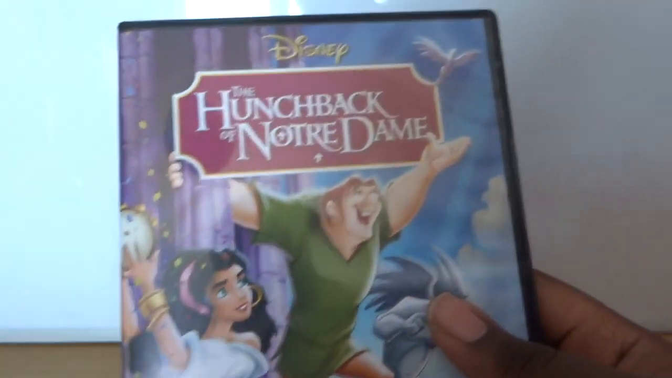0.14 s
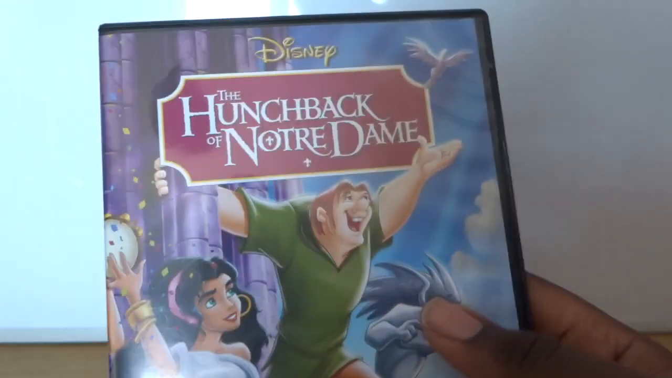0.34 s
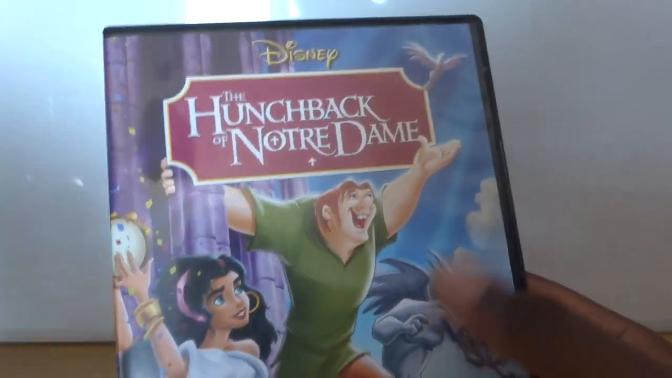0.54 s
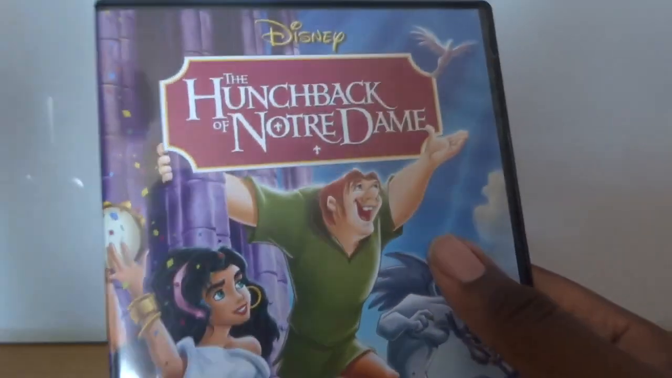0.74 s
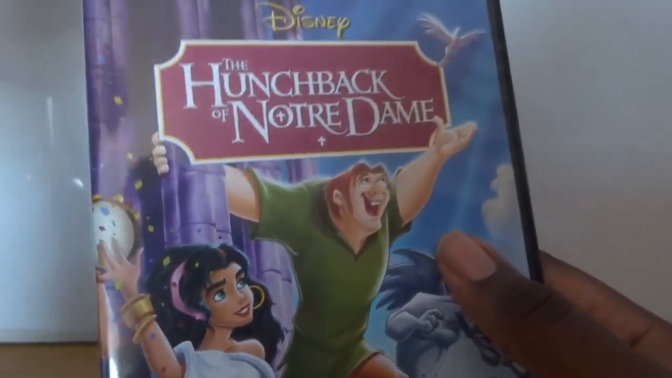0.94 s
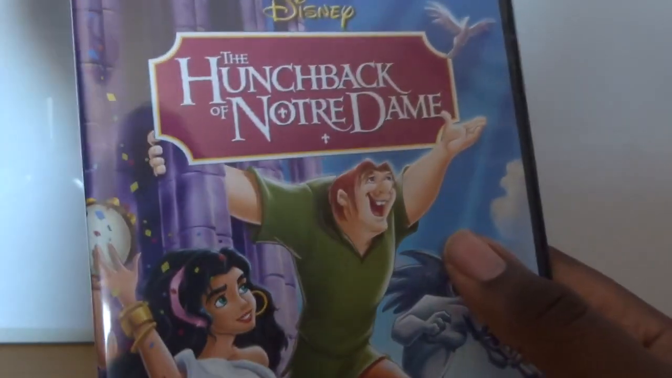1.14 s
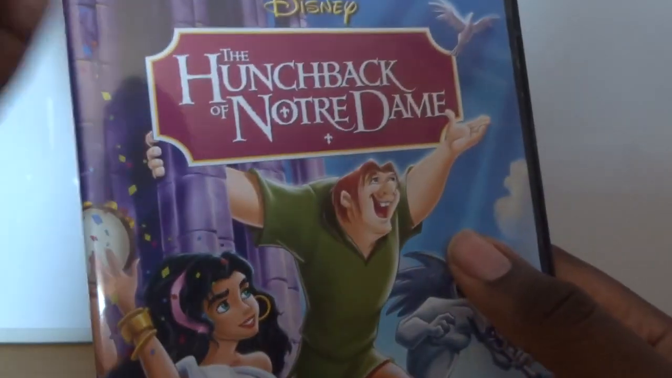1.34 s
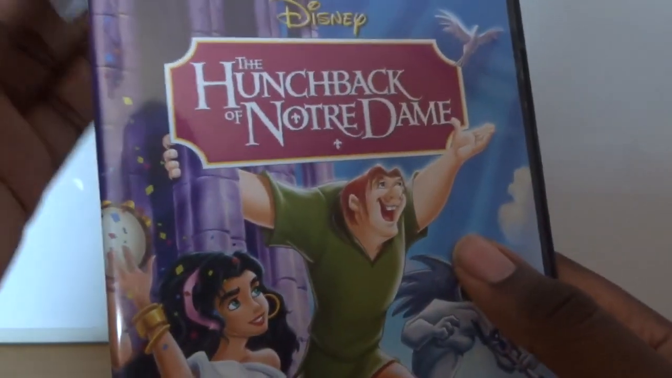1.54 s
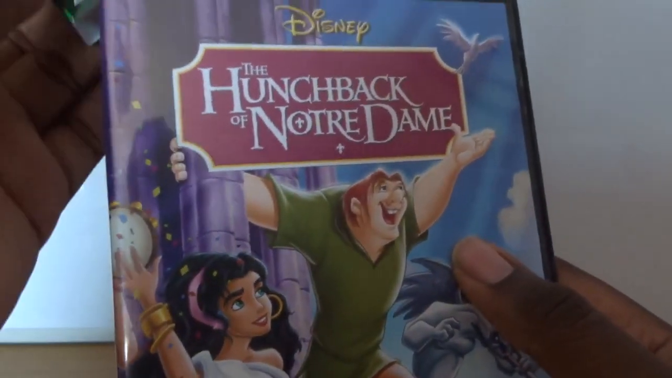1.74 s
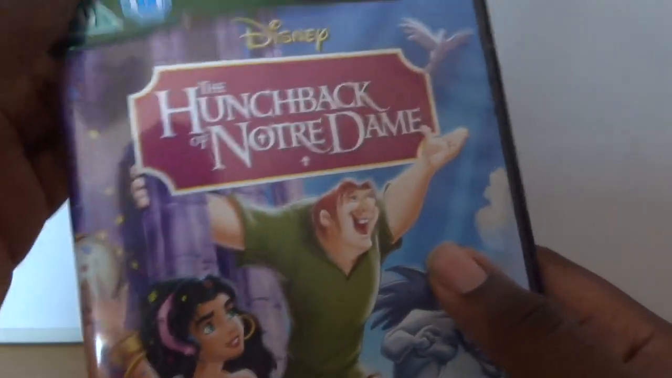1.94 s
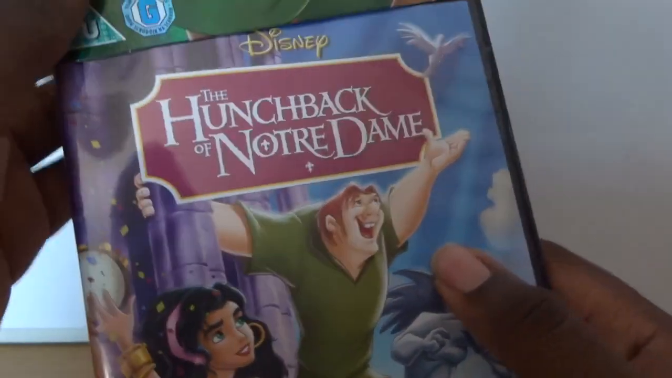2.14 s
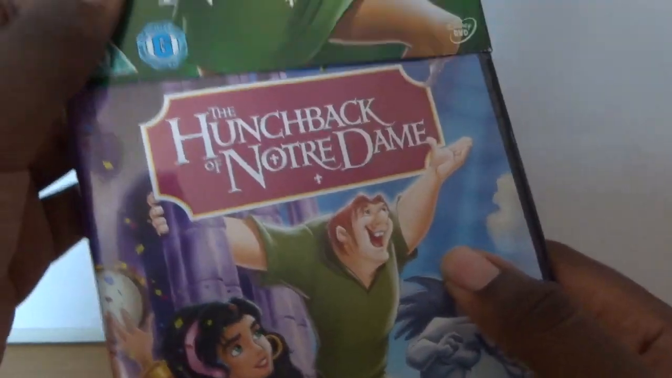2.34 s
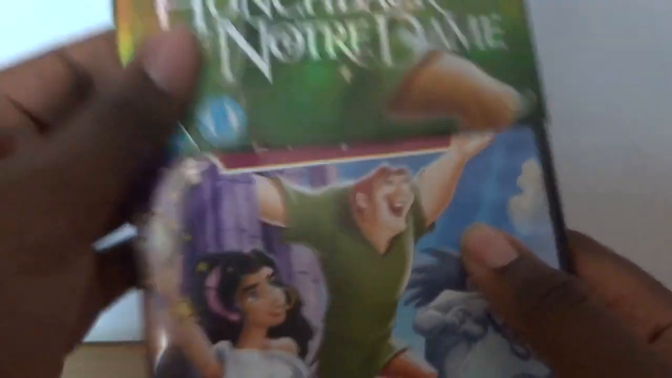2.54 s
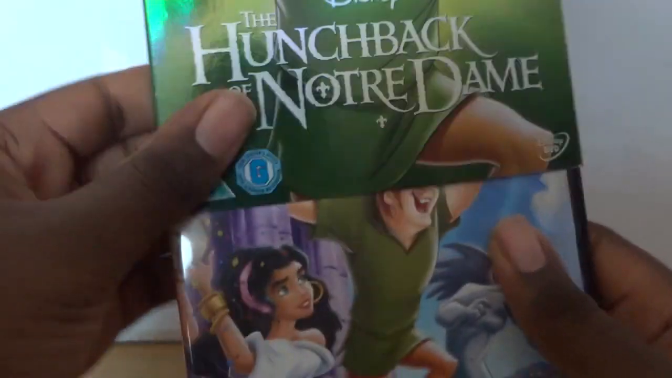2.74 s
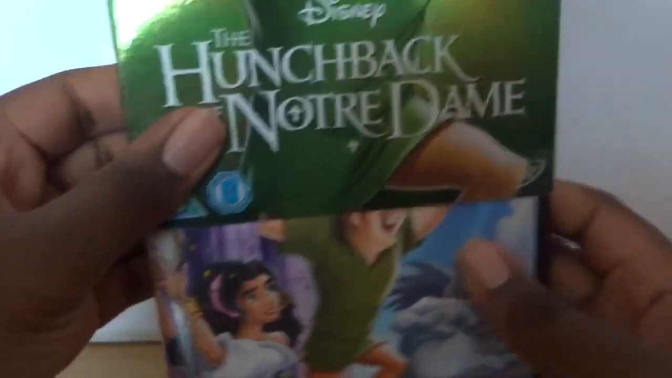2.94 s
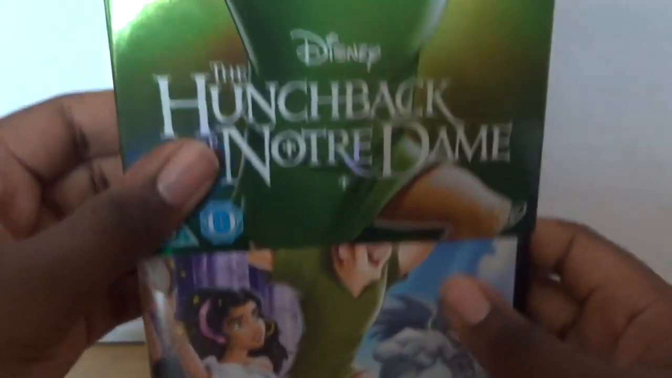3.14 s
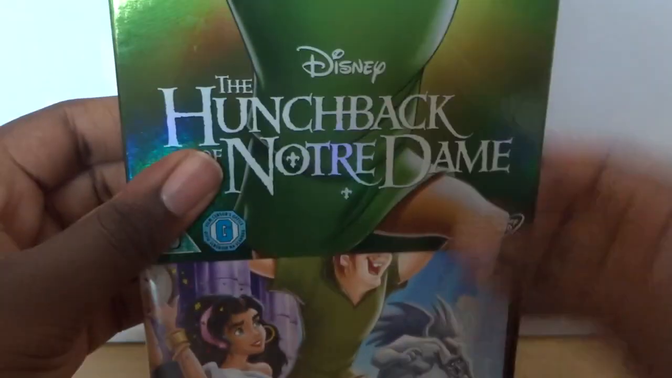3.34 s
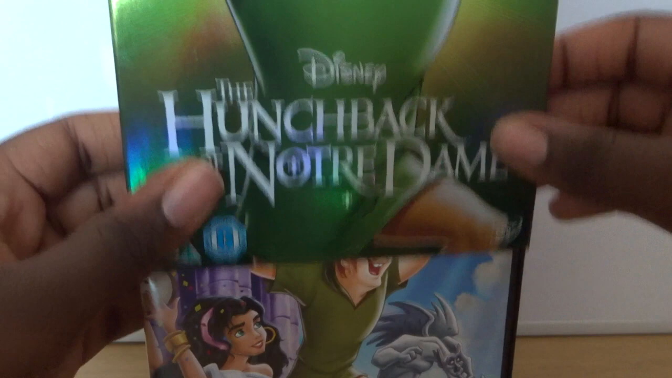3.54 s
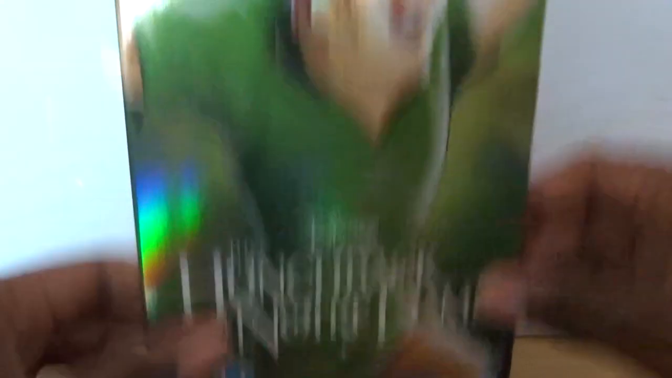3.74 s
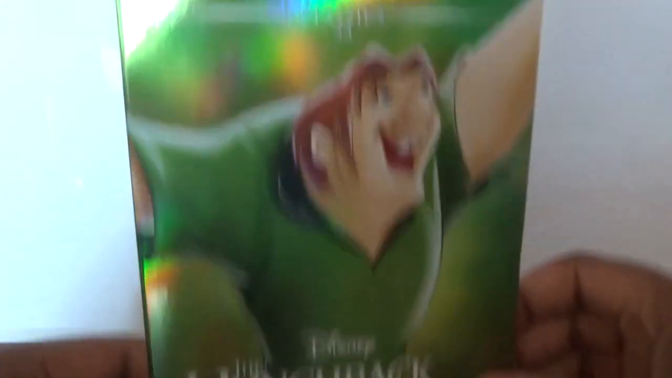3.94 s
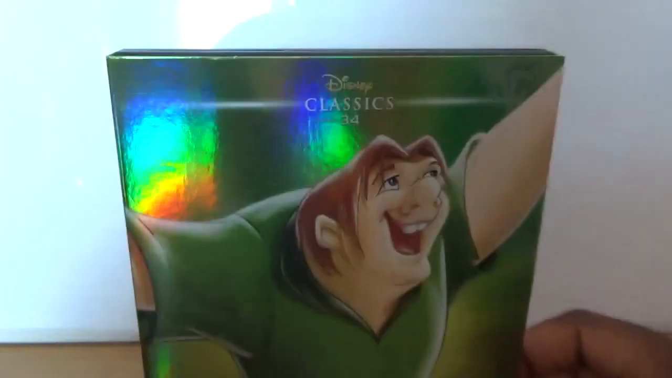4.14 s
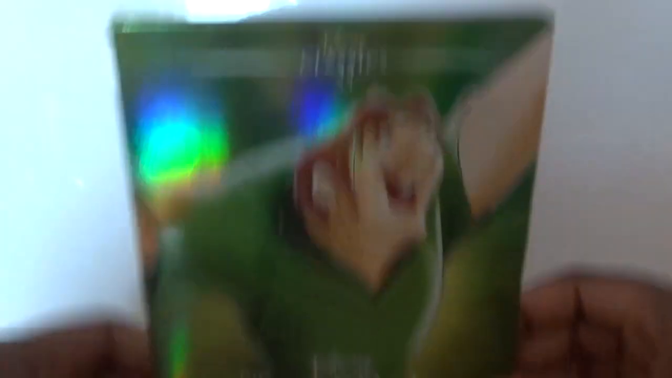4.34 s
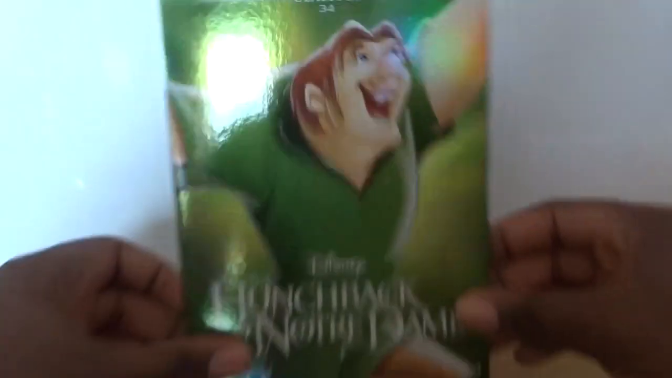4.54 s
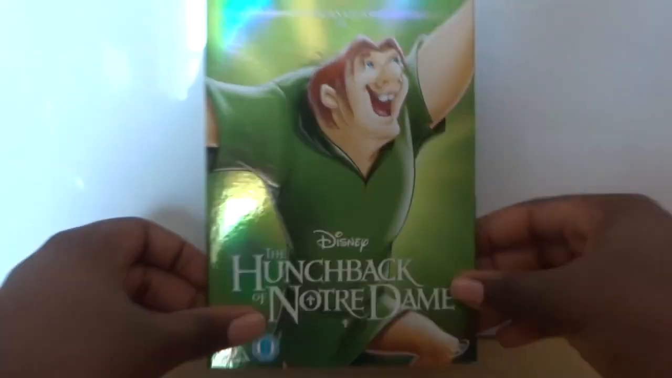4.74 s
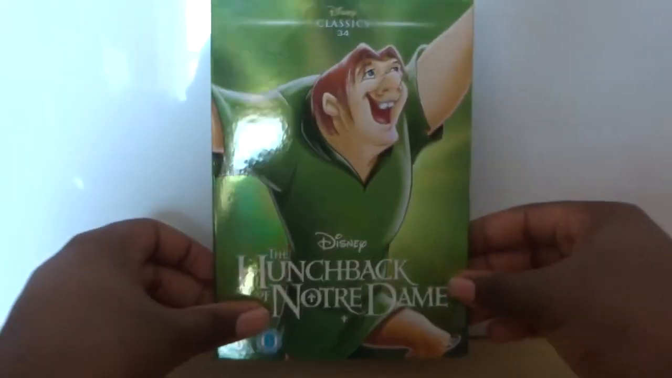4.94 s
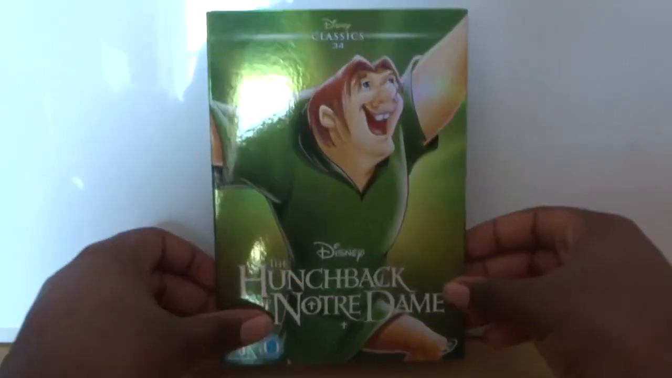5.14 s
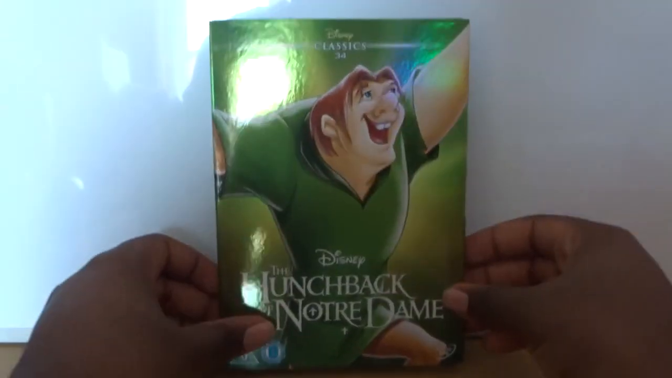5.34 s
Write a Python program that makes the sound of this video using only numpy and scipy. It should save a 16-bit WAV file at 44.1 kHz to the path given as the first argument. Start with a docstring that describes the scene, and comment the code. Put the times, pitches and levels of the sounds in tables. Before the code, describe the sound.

A close stereo scene in a small, slightly live room, with constant soft hum and a narrow fan whirr. For the first 1.5 seconds there are only very faint rubs, ticks and hand bumps on a hollow plastic case, slightly left. At about 1.65 a crisp click sounds, then scuffs and another sharp tick near 2.0. A bright click at 2.4 starts a quick wiggling rub of cardboard over plastic, catching lightly until 2.8, followed by dull taps around 2.95. At 3.27 the case knocks firmly onto a desk with small rebounds. From 3.6 to 4.15 the card sleeve scrapes down, strongest near 3.7 and 3.87, with a low wooden drone. It lands at 4.15 to 4.17 with a loud rattling knock and quickly dying buzz. Small ticks and scuffs follow, with a light tap and soft bump around 4.85, then faint finger ticks to about 5.3.

```python
"""Close stereo scene in a small room; hum and a narrow fan whirr run throughout as filtered noise.
Fingers tick and rub a hollow plastic case: impulses and friction slips drive its resonances.
A cardboard sleeve is wiggled over its top, catching lightly; the case is stood on a desk with a knock.
The sleeve scrapes down over it, droning in the desk, and lands with a rattling knock and a dying buzz.
Last come a few finger ticks, scuffs and soft bumps."""
import sys
import numpy as np
from scipy import signal
from scipy.fft import rfft, irfft, next_fast_len
from scipy.io import wavfile
from scipy.ndimage import uniform_filter1d

SR = 44100
rng = np.random.default_rng(int(sys.argv[2]) if len(sys.argv) > 2 else 0)


def transcribe(u):
    """Save the signal u as a 16-bit wav file named by the first command-line argument.

    u: samples, shape (n,) or (channels, n), limited to [-1, 1]; the rate is SR.
    q: integer samples, one column per channel.
    """
    v = np.clip(np.atleast_2d(u).T, -1, 1)
    q = np.round(v * 32767).astype(np.int16)
    wavfile.write(sys.argv[1], SR, q)


N = 242018
TOP_HZ = 11100
T = np.arange(N) / SR
SIZE = next_fast_len(N + SR)
F = np.maximum(np.arange(SIZE // 2 + 1) * SR / SIZE, 1e-3)  # Hz, kept above 0
SIDES = np.array([[1], [-1]])  # left, right

# Event levels in the tables are drive levels, ahead of body responses and layer gains.


def undb(db):
    """dB to amplitude."""
    return 10 ** (np.asarray(db) / 20)


def unit(x):
    """Scale to rms 1."""
    return x / np.sqrt(np.mean(x ** 2))


def shape(x, response):
    """Filter by a response on the frequencies F."""
    return irfft(rfft(x, SIZE) * response, SIZE)[..., :N]


def resonance(hz, width_hz):
    """Band-pass with gain 1 at its centre."""
    return 1 / (1 + 1j * (F / hz - hz / F) * hz / width_hz)


def edge(hz, kind, order=2):
    """Causal low- or high-pass response."""
    return signal.freqs(*signal.butter(order, 1, kind, analog=True), F / hz)[1]


def along(points, hz):
    """Read (Hz, value) points on a log-frequency axis."""
    f, value = np.transpose(points)
    return np.interp(np.log(hz), np.log(f), value)


def walk(rate_hz):
    """Random drift, straight between new values drawn at rate_hz."""
    k = int(SR / rate_hz)
    steps = np.repeat(rng.standard_normal(N // k + 1), k)
    return 2.0 * uniform_filter1d(steps, k)[:N]


def swell(rise_s, fall_s):
    """Envelope that grows to a peak and dies; also the time from its start to the peak."""
    lead_s = 4 * rise_s
    t = np.arange(-lead_s, 6 * fall_s, 1 / SR)
    return np.exp(np.minimum(t / rise_s, -t / fall_s)), lead_s


def soften(x, hz):
    """A softer contact loses the treble."""
    return signal.lfilter(*signal.butter(2, min(hz, .4 * SR), fs=SR), x)


def add(track, s, x):
    """Mix x into the track from time s."""
    i = max(int(s * SR), 0)
    track[i:i + len(x)] += x[:N - i]


def placed(x, left_minus_right_db):
    """Pan by a level difference between the channels."""
    return x * undb(left_minus_right_db * SIDES / 2)


# hum colour: f/Hz, density level/dB
HUM_COLOUR = [(15, -44.5), (25, -8.5), (134, 0), (303, -3), (336, -3), (391, -4.5), (518, -7.5),
              (603, -2.5), (721, -8), (1260, -11.5), (1470, -5.5), (1710, -17), (3590, -20.5),
              (11000, -24.5), (14300, -46.5), (22000, -120)]
# hum level: t/s, level/dB
HUM_LEVEL = [(0, -63.5), (.4, -61), (1.1, -62), (1.6, -61.5), (3.2, -58.5), (4.8, -62), (5.5, -62.5)]
# hum stereo width: f/Hz, side gain/dB
HUM_SIDE = [(50, -9), (110, -9), (220, 1.5), (1500, 1.5), (4000, -1.5), (10000, -8.5)]


def room_air(whine_hz=1480, whine_width_hz=110, whine_db=-11):
    """Diffuse room hum, drifting slightly in level, with the narrow whirr of a fan."""
    hum = unit(shape(rng.standard_normal((2, N)), undb(along(HUM_COLOUR, F))))
    hum = hum * undb(.5 * walk(5.3))
    whirr = unit(shape(rng.standard_normal((2, N)), resonance(whine_hz, whine_width_hz) ** 2))
    mid, side = hum + undb(whine_db) * whirr
    side = shape(side, undb(along(HUM_SIDE, F)))
    return (mid + side * SIDES) * undb(np.interp(T, *np.transpose(HUM_LEVEL)))


# reverberation: f/Hz, t60/s
REVERB_T60 = [(125, 0.94), (300, 0.27), (700, 0.61), (1500, 0.64), (4200, 0.39), (10000, 0.39)]


def room(x, wet_db, side_db, early_s=.006):
    """Diffuse tail; early lateral reflections part the channels, less so in the bass."""
    t = T[:SR * 2 // 3]
    f, frame_s, cells = signal.stft(rng.standard_normal((2, len(t))), SR, nperseg=256)
    fading = np.exp(-np.log(1000) * frame_s / along(REVERB_T60, f + 1)[:, None])
    tail = signal.istft(cells * fading, SR)[1][:, :len(t)]
    tail = tail * (t > .006)  # gap ahead of the tail, s
    tail = undb(wet_db) * tail / np.linalg.norm(tail[0])
    early = rng.standard_normal(len(t)) * np.exp(-t / early_s)
    lateral = tail[1] + undb(side_db) * early / np.linalg.norm(early)
    side = shape(x, rfft(lateral, SIZE) * edge(260, "high", order=1))
    return shape(x, rfft(tail[0], SIZE)) + side * SIDES


# soft hand bumps: peak t/s, level/dB, rise/s, f/Hz
HAND_BUMPS = [(.43, -50.5, 0.033, 143), (1.67, -48, 0.005, 135), (1.949, -55.5, 0.028, 103),
              (2.034, -46.5, 0.005, 81.5), (2.965, -54.5, .012, 110), (3.541, -51, .016, 108),
              (3.77, -49.5, 0.065, 100), (4.86, -49.5, 0.0072, 110), (5.274, -51.5, .04, 66),
              (5.43, -57, 0.054, 54)]
BUMP_FALL_S = 0.045


def bumps():
    """Soft flesh pushes the case and desk: low, dead rumbles of band-passed noise."""
    out = np.zeros(N)
    for s, db, rise_s, hz in HAND_BUMPS:
        envelope, lead_s = swell(rise_s, BUMP_FALL_S)
        band = signal.butter(2, [hz * 0.45, hz * 2.2], "band", fs=SR)
        rumble = unit(signal.lfilter(*band, rng.standard_normal(SR * 2)))
        add(out, s - lead_s, undb(db) * envelope * rumble[-len(envelope):])
    return out


# low modes of the desk top: f/Hz, t60/s, level/dB
DESK_MODES = [(131.5, 0.25, -6), (248, 0.039, -5), (257.3, 0.12, 0.5), (285.4, 0.09, 2.5),
              (310.8, 0.58, -14), (335.9, 0.38, -15)]
# modes of the case and sleeve standing on it: f/Hz, t60/s, level/dB
STANDING_MODES = [(339, 0.068, -0.5), (385.5, 0.08, -5.5), (482, 0.035, -9), (566.6, 0.072, -4.5),
                  (610.2, 0.079, 2), (673, 0.12, -11), (702, 0.063, -10), (774, .12, -12),
                  (833, 0.12, -19.5), (957, .08, -13), (1135, 0.15, -11.5), (1200, .07, -17),
                  (1354, .08, -17), (1640, 0.035, -20), (1760, 0.1, -17), (4600, .6, -13.5)]


def panel(modes, lag_hz=330, lag_width_hz=330):
    """A panel rings in its modes, radiates little deep bass; slow bending waves make the thud build up."""
    t = T[:SR // 2]
    ring = sum(undb(db) * np.cos(2 * np.pi * hz * t) * np.exp(-np.log(1000) * t / t60_s)
               for hz, t60_s, db in modes)
    dispersion = 1 - 2 * resonance(lag_hz, lag_width_hz)  # all-pass
    return rfft(ring, SIZE) * edge(170, "high", order=3) * edge(3000, "low", order=2) * dispersion


# blows on the desk: t/s, level/dB, time to peak force/ms, clack re boom level/dB, number of contacts
DESK_BLOWS = [(.255, -46, 0.33, -2, 1), (.584, -54, 0.42, 14, 1), (1.166, -52, 0.29, 10, 1),
              (2.033, -30.5, 0.75, 0, 1), (3.272, -6.5, 0.45, -7, 1), (3.294, -22.5, .2, -5, 1),
              (3.306, -19.5, 0.45, -6, 2), (3.358, -27, 0.4, 3, 2), (3.384, -28.5, 0.25, -9, 1),
              (3.535, -34, .17, -4, 1), (3.579, -28.5, 0.18, -3, 1), (4.150, -7.5, 0.57, -12, 1),
              (4.158, -20.5, 0.3, 8, 1), (4.172, -9, .24, 5.5, 4), (4.246, -29.5, 0.099, 3, 2),
              (4.303, -32, 0.097, -1, 1), (4.843, -45, 0.11, 8, 1)]
REBOUND_S, REBOUND_LOSS_DB = .012, 5.5  # per contact


def rebounds():
    """The case rebounds after a blow, each contact weaker than the one before."""
    return [(s + k * REBOUND_S, db - k * REBOUND_LOSS_DB, peak_ms, clack_db)
            for s, db, peak_ms, clack_db, count in DESK_BLOWS for k in range(round(count))]


def knocks(desk, standing, rattle=0.17, rattle_s=0.015):
    """Each blow booms in the desk and clacks in the shivering case; a longer contact is duller."""
    boom, clack, t, blows = np.zeros(N), np.zeros(N), T[:SR // 20], rebounds()
    noises = rng.standard_normal((len(blows), len(t)))
    for (s, db, peak_ms, clack_db), noise in zip(blows, noises):
        age = 1000 * t / peak_ms
        push = age * np.exp(-age)
        push = push / push.sum()
        shiver = soften(noise, 1100) * np.exp(-t / rattle_s)
        contacts = (t == 0) + rattle * shiver / np.linalg.norm(shiver)
        add(boom, s, undb(db) * push)
        add(clack, s, undb(db + clack_db) * signal.fftconvolve(push, contacts))
    return undb(-9.0) * (shape(boom, desk) + shape(clack, standing))


def slips(rate_hz, spread_db):
    """Friction force: dense micro-slips of uneven size, rms 1."""
    happens = rng.random(N) < rate_hz / SR
    sign = rng.choice([-1, 1], N)
    return unit(happens * sign * undb(spread_db * rng.uniform(-1.2, 1, N)))


LANDING_S = 4.172  # the sleeve reaches the desk


def chatter(standing, db=-19.0, fall_s=0.048):
    """After the landing the case buzzes against the desk: slips in its modes, dying away."""
    age_s = np.maximum(T - LANDING_S, 0)
    band = edge(450, "high", order=2) * edge(1800, "low", order=5)
    buzz = unit(shape(slips(rate_hz=2400, spread_db=2.5), standing * band))
    return buzz * undb(db) * (age_s > 0) * np.exp(-age_s / fall_s)


# hollow case: f/Hz, width/Hz, level/dB
SHELL_RESONANCES = [(635.5, 35, 12), (690, 28, 7), (866, 72, 10), (1035, 60, 2.5), (1150, 51, 8.5),
                    (1324, 78, 11), (1941, 210, 10), (2160, 47, 13.5), (2320, 31, 4), (2660, 79, 0.5),
                    (2996, 95, 9), (3625, 51, 5), (4510, 180, -5.5), (5380, 390, -6), (6440, 250, -4.5)]
# card sleeve with the case inside: f/Hz, width/Hz, level/dB
SLEEVE_RESONANCES = [(600, 46, 9.5), (850, 77, 0), (1297, 85, 6), (2154, 160, -1.5), (2595, 140, -6.5),
                     (3580, 170, -5), (3840, 160, -5), (4530, 150, -3.5)]


def body_ring(resonances):
    """Sum of the resonances, to be added to a flat direct path."""
    return sum(undb(db) * resonance(hz, width_hz) for hz, width_hz, db in resonances)


WIGGLE_START_S, WIGGLE_END_S = 2.4, 2.8
CATCH_DB, CATCH_SPREAD_DB, CATCH_HZ = -28.5, 2.5, 800


def catches(count=8):
    """The sleeve, wiggled over the case top, catches lightly at uneven moments: rows like SHELL_TICKS."""
    step_s = (WIGGLE_END_S - WIGGLE_START_S) / count
    return [(WIGGLE_START_S + step_s * (k + when), CATCH_DB + CATCH_SPREAD_DB * (2 * size - 1), CATCH_HZ)
            for k, (when, size) in enumerate(rng.random((count, 2)))]


# ticks and taps: t/s, level/dB, brightness f/Hz
SHELL_TICKS = [(.256, -36, 1500), (1.166, -38, 1510), (1.637, -41, 1800), (1.658, -25.5, 3000),
               (1.666, -15.5, 9200), (1.982, -28, 4500), (2.031, -19, 9000), (2.121, -37.5, 3000),
               (2.383, -15.5, 3500), (2.925, -23, 1290), (2.950, -21.5, 900), (3.063, -27.5, 800),
               (3.111, -31.5, 900), (3.535, -23, 1400), (3.577, -26.5, 3020), (4.201, -17, 2500),
               (4.8425, -28.5, 9200), (4.849, -35.5, 2000), (4.870, -30, 1000), (4.932, -39.5, 3000),
               (5.093, -37.5, 11130), (5.133, -37.5, 12000), (5.293, -35, 15030)]


def clicks(body, crunch=0.3, crunch_s=0.0032, hard=0.079):
    """Each tick is a cushioned push with a trace of hard contact and a brief crunch."""
    force, t, ticks = np.zeros(N), T[:SR // 40], SHELL_TICKS + catches()
    noises = rng.standard_normal((len(ticks), len(t)))
    for (s, db, hz), noise in zip(ticks, noises):
        contact = (t == 0) + crunch * noise * np.exp(-t / crunch_s)
        push = soften(contact, hz) + hard * contact
        add(force, s, undb(db) * push / np.linalg.norm(push))
    return undb(4.5) * shape(force, body)


# card-edge scuffs: peak t/s, level/dB, rise/s, brightness f/Hz
EDGE_SCUFFS = [(.403, -51, 0.011, 3140), (0.444, -51.5, 0.0042, 1800), (.634, -59.5, 0.0082, 2500),
               (1.666, -36.5, 0.0044, 4930), (1.726, -43, .01, 2190), (1.908, -42, 0.0055, 5040),
               (1.961, -44.5, 0.0086, 3800), (2.025, -29.5, .004, 7000), (2.379, -32, 0.011, 7700),
               (2.459, -35, .0095, 3000), (2.737, -42.5, 0.013, 11000), (2.966, -38, .004, 900),
               (3.305, -54, .012, 3000), (3.683, -31.5, .013, 2000), (3.858, -31, .008, 3800),
               (4.163, -30.5, 0.013, 9000), (4.227, -34.5, 0.0023, 4200), (4.25, -37, 0.0027, 2970),
               (4.303, -40, 0.0056, 3200), (5.066, -58, 0.0073, 7960)]
SCUFF_FALL_S = 0.0086


def scuffs(body):
    """A card edge catches on the plastic, builds up and slips free."""
    force, grain = np.zeros(N), slips(rate_hz=7000, spread_db=1.5)
    for s, db, rise_s, hz in EDGE_SCUFFS:
        envelope, lead_s = swell(rise_s, SCUFF_FALL_S)
        grit = unit(soften(grain[int(s * SR):][:len(envelope)], hz))
        add(force, s - lead_s, undb(db) * envelope * grit)
    return shape(force, body)


# colour of card scraping on plastic: f/Hz, density level/dB
SCRAPE_COLOUR = [(880, -37), (1500, 4.5), (2180, -3), (2390, -1.5), (2600, -0.5), (3280, -1.5), (4510, -4),
                 (11000, -13), (14300, -33.5), (22000, -120)]


def rubbing(scrape_gain, drag_gain, hiss_gain, body, rate_hz, judder_db):
    """Slips sound the shell: pressure gives a dull juddering drag, speed a scrape and its hiss."""
    force = slips(rate_hz, spread_db=7.5) * undb(judder_db * np.tanh(walk(200)))
    drag_force = force * undb(3.5 * np.tanh(walk(70)))
    dull = edge(710, "high", order=3) * edge(1400, "low", order=4)
    drag = unit(shape(drag_force, body * dull))
    grit = body * undb(along(SCRAPE_COLOUR, F))
    middle = abs(edge(1900, "high", order=4) * edge(6000, "low", order=4))
    scrape = unit(shape(np.roll(force, SR), grit * middle))  # 1 s shift decorrelates it from the drag
    treble = edge(6000, "high", order=4) * edge(TOP_HZ, "low", order=8)
    hiss = unit(shape(slips(rate_hz, spread_db=7.0), grit * treble))
    return drag * drag_gain + scrape * scrape_gain + hiss * hiss_gain


def glide(s, rise_s, fall_s):
    """Speed of a hand that gathers pace, passes a rounded top near time s and slows."""
    return 2 * np.exp(-np.logaddexp((s - T) / rise_s, (T - s) / fall_s))


# strokes of fingers and card, case loose: t/s, scrape level/dB, rise/s, fall/s, drag re scrape level/dB
HAND_STROKES = [(.31, -70.5, .02, 0.024, 9), (.425, -63, .025, .025, 4), (.55, -69.5, 0.041, 0.052, 5.5),
                (1.715, -53, 0.026, 0.031, 4.5), (1.885, -58.5, 0.026, .03, 6),
                (1.962, -46.5, 0.018, 0.017, 2), (2.04, -50, 0.0094, .025, -2.5),
                (2.27, -51.5, 0.022, 0.035, 3), (2.37, -42.5, .013, 0.017, 2.5),
                (2.478, -36, 0.023, 0.073, -10.5), (2.738, -38.5, 0.028, .015, -17),
                (2.82, -59, 0.11, 0.1, 6), (2.952, -49, 0.034, 0.029, 3.5), (4.34, -58.5, .02, 0.061, -7),
                (4.868, -57.5, .008, 0.019, 0)]
# hiss re scrape when the scrape is at BRISK_DB, and its growth in dB per dB
BRISK_DB, HISS_DB, HISS_GROWTH = -33.5, -2.5, 0.355


def rubs(body):
    """Each stroke swells and fades; the faster it goes, the brighter it is."""
    scrape, drag = 0, 0
    for s, db, rise_s, fall_s, drag_db in HAND_STROKES:
        gain = undb(db) * glide(s, rise_s, fall_s)
        scrape = np.hypot(scrape, gain)
        drag = np.hypot(drag, gain * undb(drag_db))
    hiss = scrape * undb(HISS_DB) * (scrape / undb(BRISK_DB)) ** HISS_GROWTH
    return rubbing(scrape, drag, hiss, body, rate_hz=6000, judder_db=2.0)


def stroke(s, db, fade_s=0.018):
    """Gain of one hand movement, dying quickly outside its span."""
    outside_s = np.maximum(np.maximum(s[0] - T, T - s[-1]), 0)
    return undb(np.interp(T, s, db)) * np.exp(-np.minimum(outside_s / fade_s, 20))


# sleeve sliding down: t/s, scrape level/dB, hiss level/dB, desk drone level/dB
SLEEVE_SLIDE = [(3.585, -56.5, -76, -35.5), (3.607, -47.5, -58.5, -43.5), (3.683, -32.5, -39, -40.5),
                (3.763, -35, -35, -32.5), (3.865, -29, -37.5, -32), (3.893, -30, -36.5, -38.5),
                (3.955, -39, -47, -37), (4.135, -41.5, -44, -39), (4.145, -39, -47, -32)]
SLIDE_DRAG_DB = -44.5  # snug fit: steady drag


def desk_drone(body):
    """The sliding sleeve shakes the desk through the standing case."""
    s, *_, drone_db = np.transpose(SLEEVE_SLIDE)
    band = edge(130, "high", order=3) * edge(700, "low", order=2)
    return unit(shape(slips(rate_hz=1500, spread_db=4), body * band)) * stroke(s, drone_db)


def slide(body, hiss_gain_db=1.5):
    """The sleeve runs down over the case in one long scrape."""
    s, scrape_db, hiss_db, _ = np.transpose(SLEEVE_SLIDE)
    drag = stroke(s, np.full(len(s), SLIDE_DRAG_DB))
    hiss = stroke(s, hiss_db + hiss_gain_db)
    return rubbing(stroke(s, scrape_db), drag, hiss, body, rate_hz=14000, judder_db=2.0)


# where the hands work: t/s, left minus right level/dB
HAND_PLACE = [(0, 5.5), (1.7, 2), (2.3, 1.5), (2.8, -1), (3.3, -0.5), (3.8, -0.6), (4.2, 0), (5.4, 3.5)]


def scene():
    """Mix panned handling and thuds, bumps, their room and the hum."""
    ring = body_ring(SHELL_RESONANCES)
    radiation = edge(520, "high", order=3)
    loose = (1 + ring) * radiation * undb(-4.5)
    # the sleeve damps the case inside and lends its own weaker resonances
    tight = (1 + body_ring(SLEEVE_RESONANCES)) * radiation
    handling = rubs(loose) + scuffs(loose) + clicks(loose)
    sliding = slide(tight) * undb(-0.4)
    desk, standing = panel(DESK_MODES), panel(STANDING_MODES)
    drone = undb(-0.7) * desk_drone(desk + 0.73 * standing)
    thuds = knocks(desk, standing) + chatter(standing) + drone
    # shell resonances are a near sound: the room gets a smoother colour
    far = shape(handling, 1 / (1 + 0.28 * ring)) * undb(2) + sliding
    echo = room(far, wet_db=-14.5, side_db=-19.0) + room(thuds, wet_db=-20.5, side_db=-20)
    hands = placed(handling + sliding, np.interp(T, *np.transpose(HAND_PLACE)))
    return hands + placed(thuds, -1.2) + bumps() + echo + room_air()


def record(dry):
    """The recorder cuts the top steeply: elliptic low-pass at TOP_HZ."""
    return signal.sosfilt(signal.ellip(12, .2, 75, TOP_HZ, fs=SR, output="sos"), dry)


dry = scene()
out = record(dry)
transcribe(out)
```